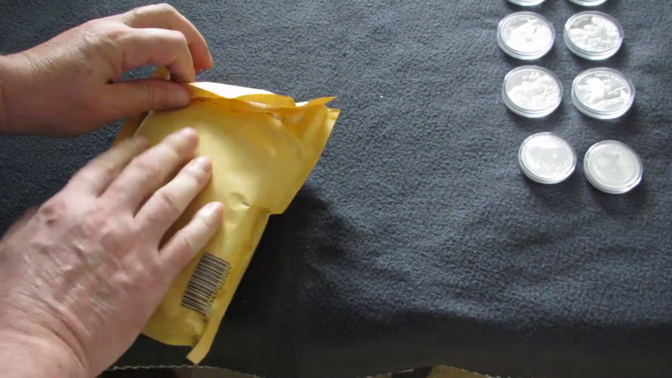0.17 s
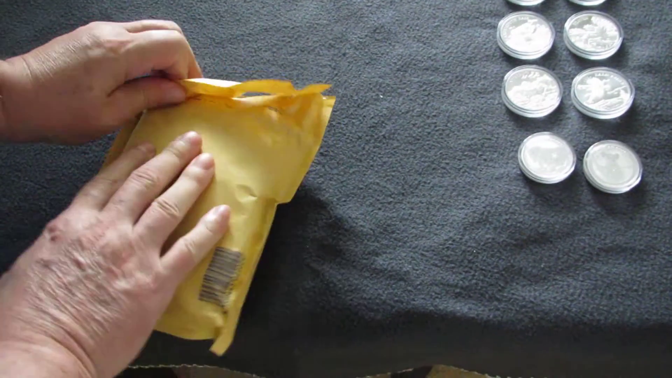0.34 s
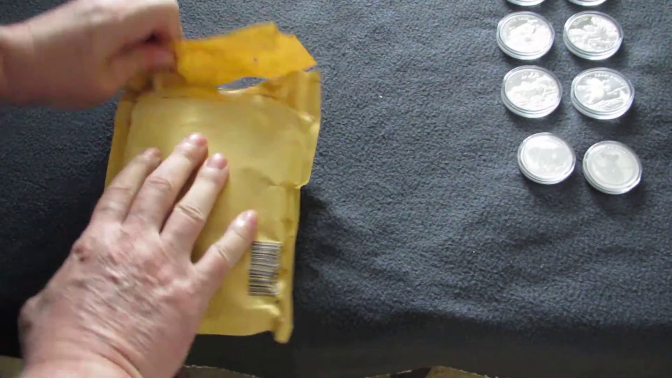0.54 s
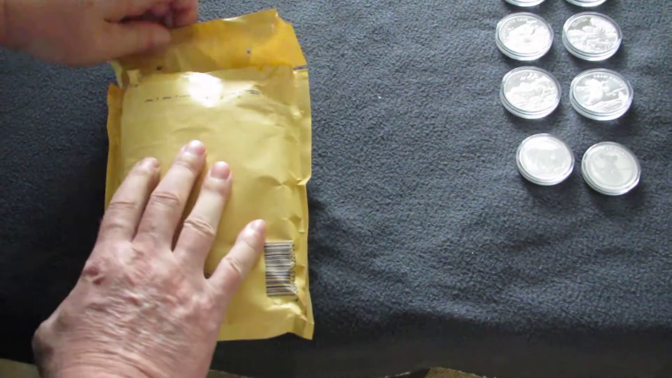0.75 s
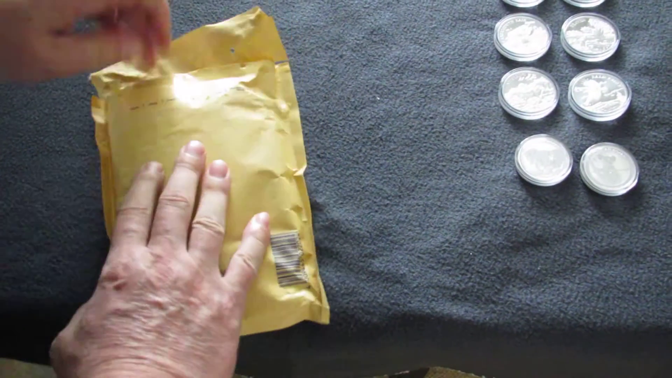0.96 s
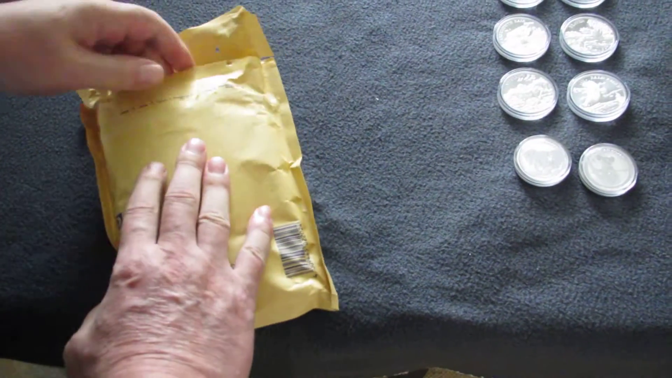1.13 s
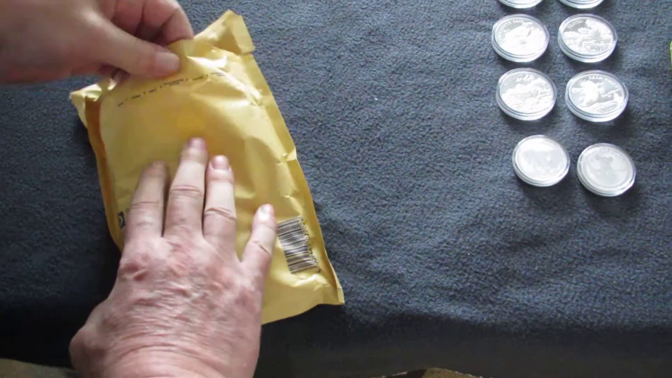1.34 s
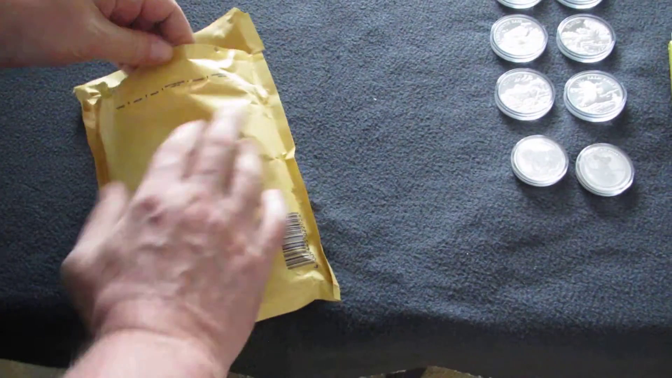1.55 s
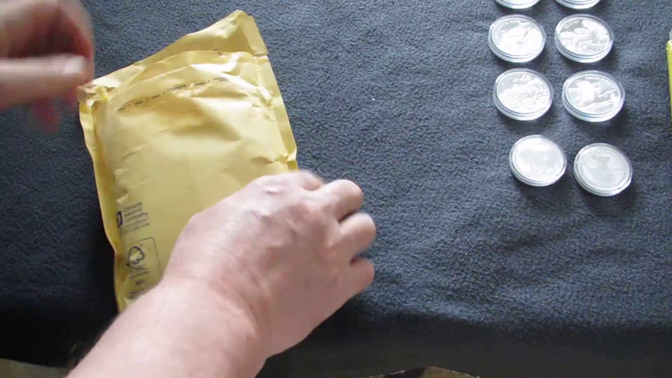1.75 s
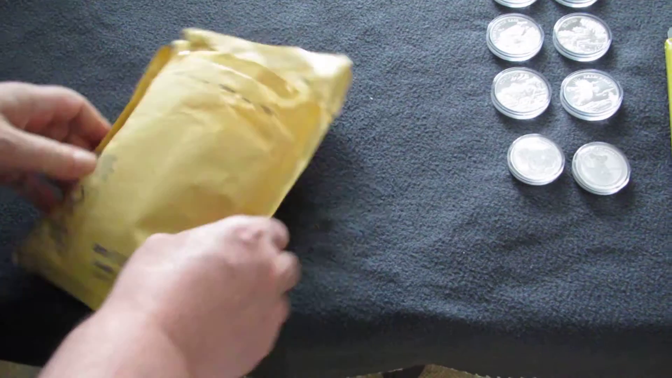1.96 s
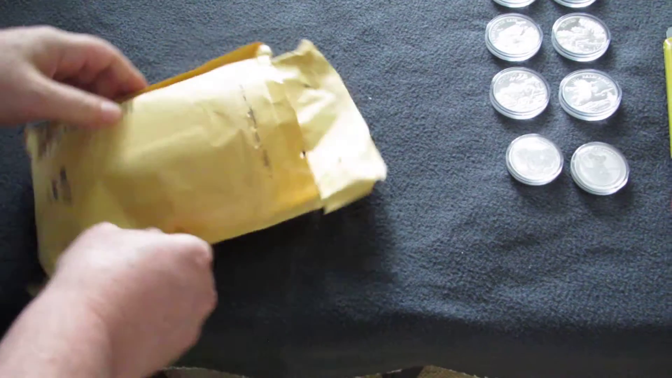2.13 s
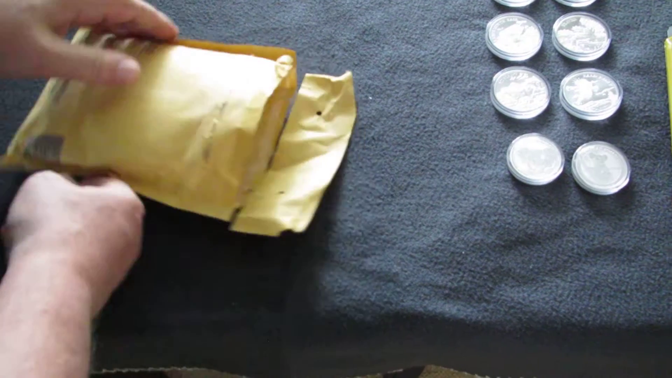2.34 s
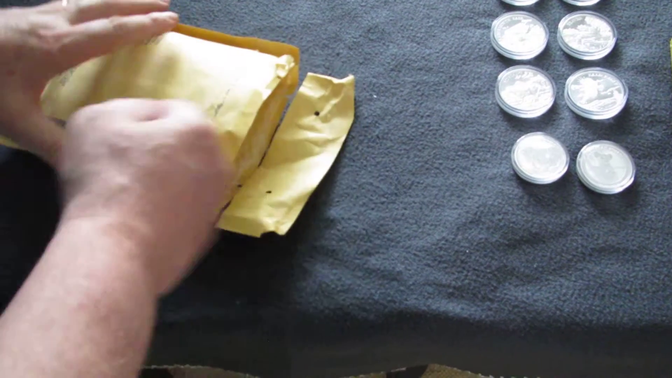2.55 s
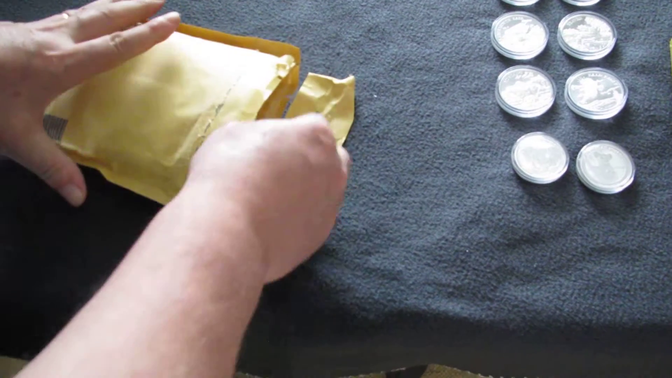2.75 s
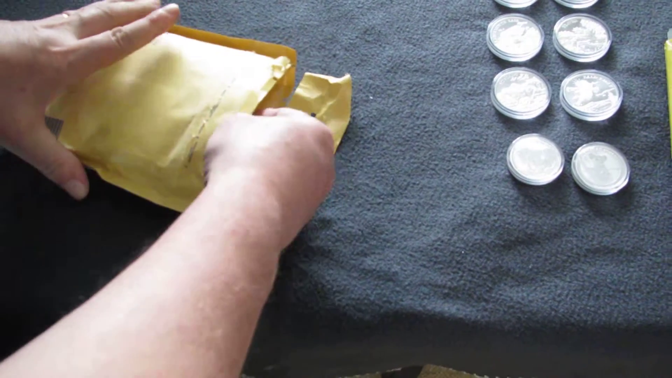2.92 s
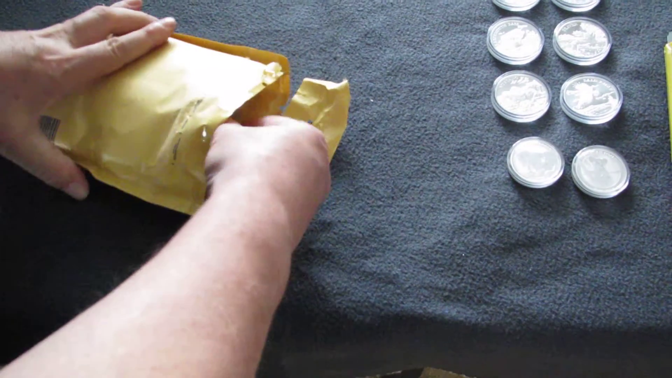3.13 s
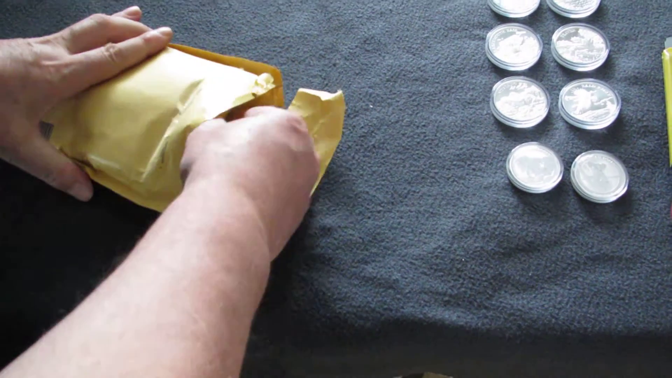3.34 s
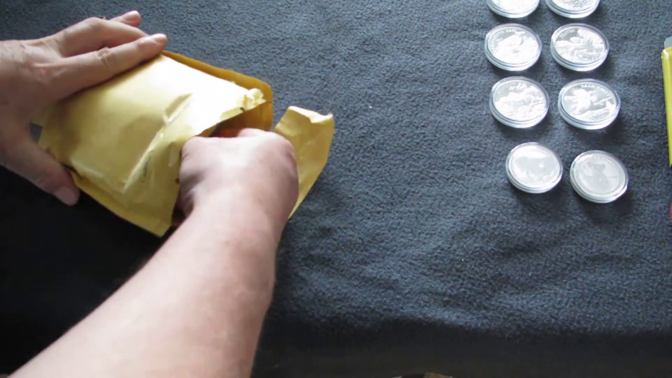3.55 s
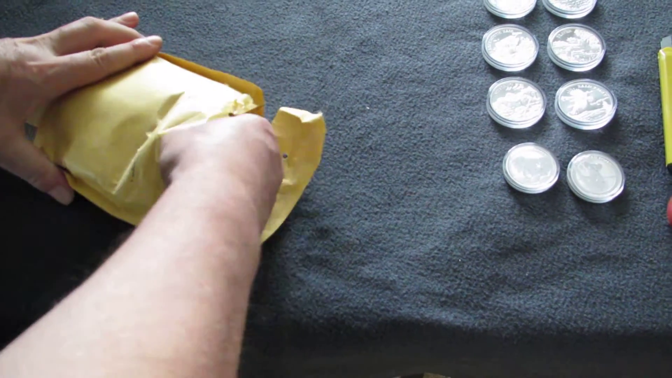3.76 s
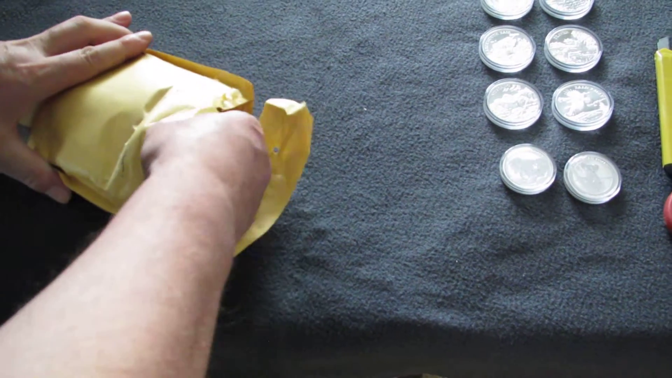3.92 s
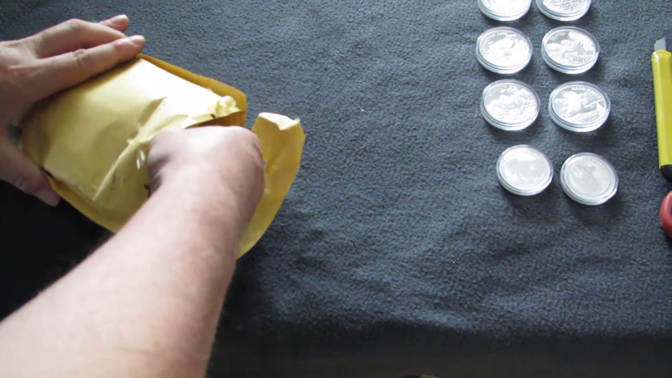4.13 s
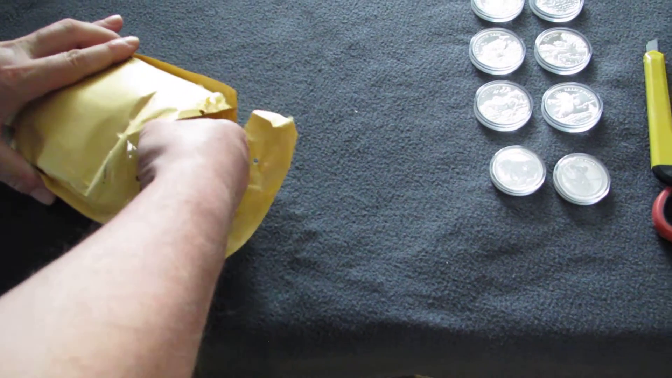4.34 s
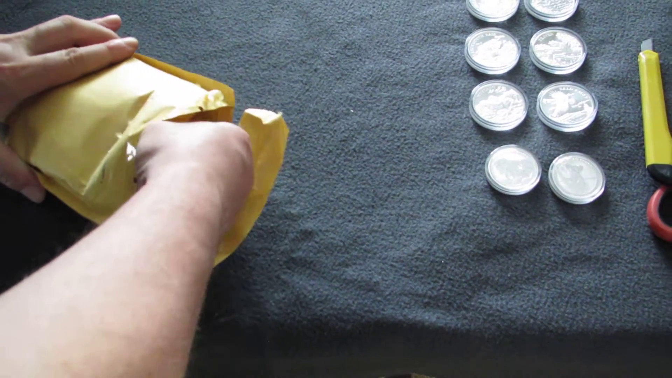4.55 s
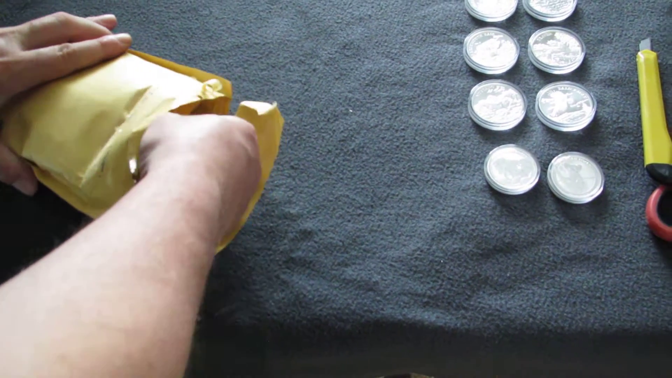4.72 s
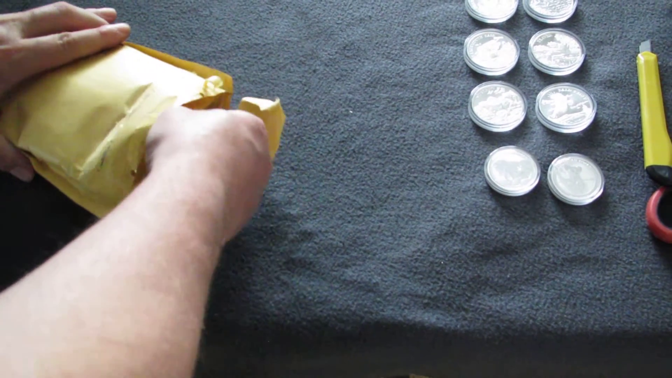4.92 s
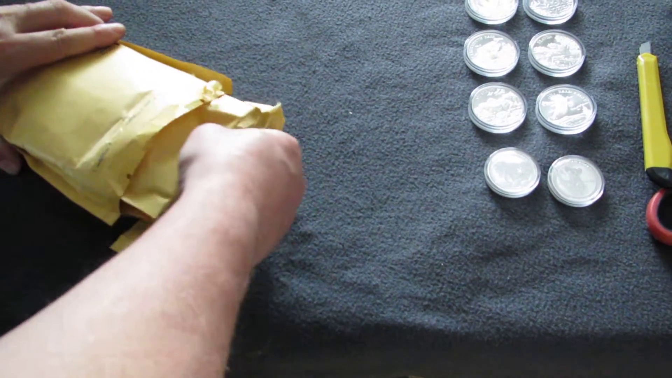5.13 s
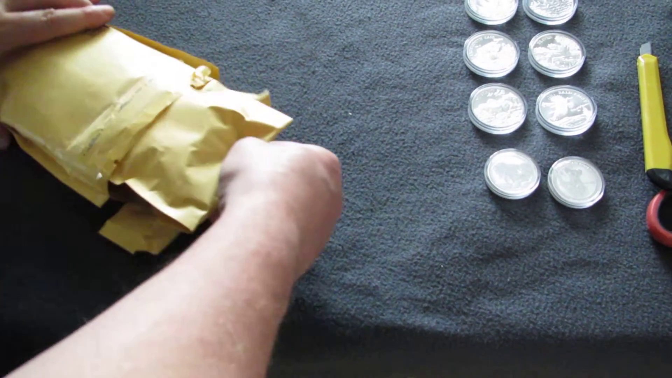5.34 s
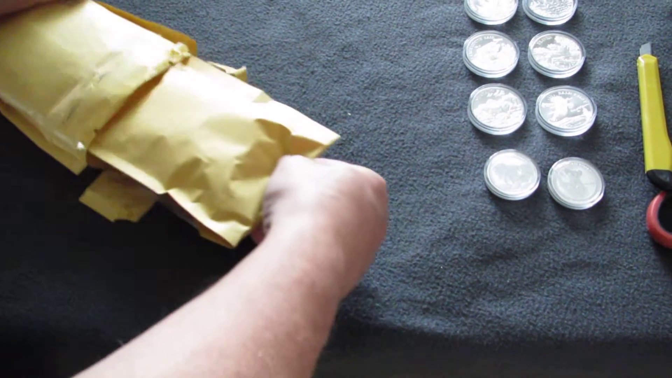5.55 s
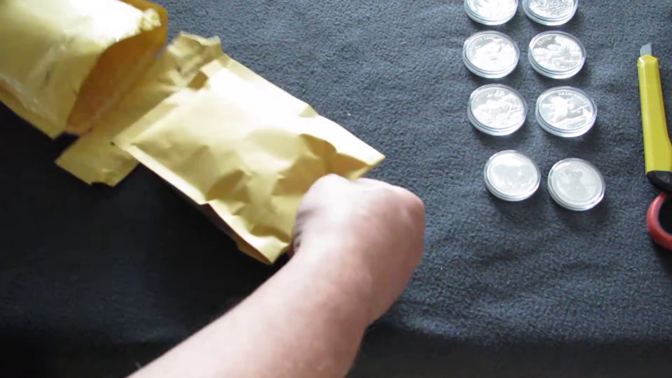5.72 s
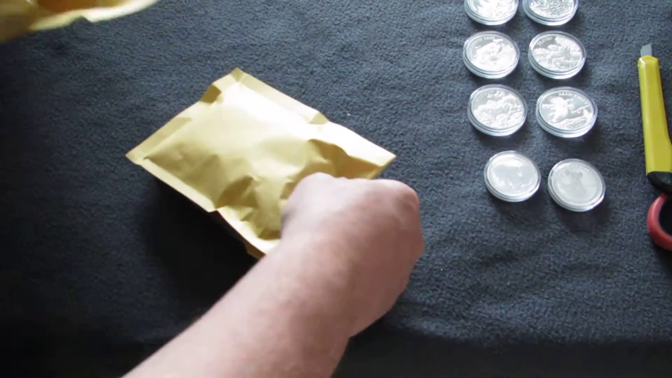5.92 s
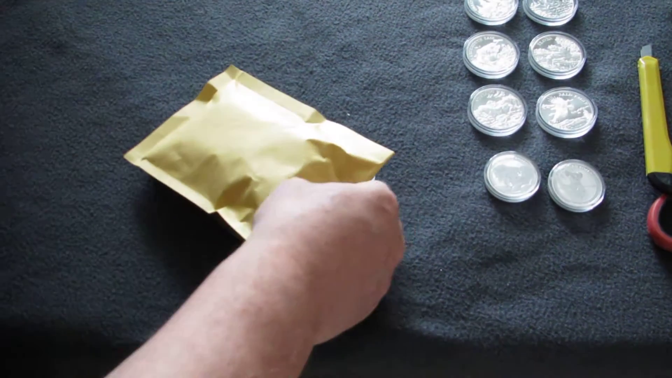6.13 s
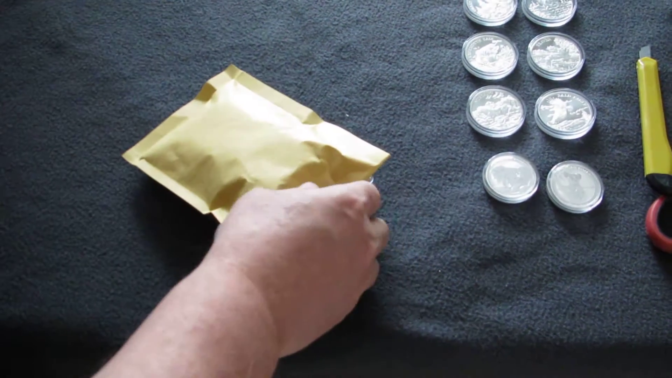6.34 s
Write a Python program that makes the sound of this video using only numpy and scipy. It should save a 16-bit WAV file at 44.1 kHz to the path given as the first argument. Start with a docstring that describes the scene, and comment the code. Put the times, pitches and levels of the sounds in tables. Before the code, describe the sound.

A padded paper mailer is opened close to a stereo camera microphone in a small, fairly dead room with a faint, wide, steady hush. Small crackles start at once, then a sharp, dense fibrous rip at about 0.2-0.45 s, with hard papery pops. Light handling dwindles until 1 s. From 1.0 to 1.65 s the envelope is pressed and shifted, in clustered crisp pops over dull padding rustle. A soft gliding hiss over cloth at 1.7-2.0 s leads into strong snaps until 2.2 s. A near lull follows until 2.65 s. Fingers then work inside from 2.7 to 4.8 s, with uneven crackles, muffled creases and small ticks. At 4.8-5.5 s a packet slides out with a continuous dry rustle and a hard snap near 5.1 s. A last double crackle comes around 5.6 s, then only faint touches until about 6.4 s.

```python
"""Short pops and cracks, then a rip: hands tear the end off a padded paper mailer, turn it over on a cloth
and drag a packet out. Creases are damped panel pulses with fibre noise and a shudder of the whole envelope.
Handling and the rip are clumped random slips in the colours of padding, wrinkles, sliding paper and fibres;
the swivel over the cloth is two gliding bands of hiss. A small, fairly dead room adds a short wide tail and
a steady wide hush, all heard through the two microphone ports of a close camera."""
import sys
import numpy as np
from scipy import signal
from scipy.fft import rfft, irfft
from scipy.io import wavfile
from scipy.ndimage import uniform_filter1d

SR = 44100
rng = np.random.default_rng(int(sys.argv[2]) if len(sys.argv) > 2 else 0)


def pcm_store(signal):
    """Save signal as 16-bit PCM."""
    levels = np.round(np.clip(np.atleast_2d(signal), -1, 1) * 32767)
    wavfile.write(sys.argv[1], SR, levels.astype(np.int16).T)


N = 285768
EDGE_HZ = 16000  # upper band limit
TAPS = 2048
HZ = np.fft.rfftfreq(TAPS, 1 / SR)
TIME = np.arange(N) / SR

# Spectrum of cracking or prickling fibres. Each row: frequency in Hz, gain in dB.
CRACK_SPECTRUM = [(60, -31), (300, -23.5), (1500, -2.5), (3000, 5), (5200, 2), (6600, -8), (8300, -2),
                  (11000, -5.5), (15000, -30)]


def amp(db):
    """Decibels to gain."""
    return 10 ** (np.asarray(db) / 20)


def unit(x):
    """Scales to an rms of one."""
    return x / np.sqrt(np.mean(x ** 2) + 1e-20)


def read(points, hz, axis=1):
    """Interpolates one column of a table over log frequency."""
    table = np.transpose(points)
    return np.interp(np.log(hz + 1), np.log(table[0] + 1), table[axis])


def level(rows, axis=1):
    """One dB column of a time curve as a gain for every sample."""
    table = np.transpose(rows)
    return amp(np.interp(TIME, table[0], table[axis]))


def add(mix, start_s, sound):
    """Mixes a sound in at start_s, cut at the end of the mix."""
    part = mix[max(round(start_s * SR), 0):][:len(sound)]
    part += sound[:len(part)]


def pulse(gain):
    """Minimum-phase pulse with these gains on the grid HZ: the sharpest causal one."""
    log_gain = np.log(np.maximum(gain, 1e-5))
    circle = np.r_[log_gain, log_gain[-2:0:-1]]
    spectrum = np.exp(np.conj(signal.hilbert(circle)))
    return irfft(spectrum[:len(HZ)])


def colour(x, spectrum):
    """Sends x through a causal filter with this spectrum."""
    return signal.oaconvolve(x, pulse(amp(read(spectrum, HZ))))[:len(x)]


def ripple(depth_db):
    """Chance peaks and dips of one patch of paper, as a gain on HZ."""
    knots_hz = np.geomspace(100, EDGE_HZ, 32)
    knots = np.c_[knots_hz, rng.standard_normal(len(knots_hz))]
    return amp(depth_db * read(knots, HZ))


def hump(hz, q, reach=1.1):
    """Gain of a heavily damped resonance; the padding soaks up what lies far above it."""
    resonance = 1 / (1 + q ** 2 * (HZ / hz - hz / (HZ + 1)) ** 2) ** 2
    soak_hz = reach * hz * (1 + 1 / q)
    return resonance / (1 + (HZ / soak_hz) ** 6)


def disperse(x, lag_s):
    """Bending waves: treble outruns bass; lag_s is the delay at one kilohertz."""
    delay_s = lag_s * np.sqrt(1000 / np.maximum(HZ, 200))
    phase = 2 * np.pi * np.cumsum(delay_s) * HZ[1]
    return irfft(rfft(x, TAPS) * np.exp(-1j * phase))


def burst(decay_s, rise_s, lumpy_db=0):
    """A dying spray of micro-slips with energy one; lumpy_db makes a few of them stand out."""
    t = np.arange(2 * TAPS) / SR
    spray, lumps = rng.standard_normal((2, len(t)))
    envelope = np.exp(-t / decay_s) * (1 - np.exp(-t / rise_s))
    spray = spray * amp(lumpy_db * lumps) * envelope
    return spray / np.linalg.norm(spray)


def at_ports(grain, apart_hz=14000, scatter_s=0.0006):
    """Short waves scatter on the camera body and reach the two ports differently."""
    scattered = signal.oaconvolve(grain, burst(scatter_s, scatter_s))[:TAPS]
    share = np.clip(.5 * (HZ / apart_hz) ** 2, 0, .7)
    mid = rfft(grain, TAPS) * np.sqrt(1 - share ** 2)
    side = rfft(scattered, TAPS) * share
    return irfft([mid + side, mid - side])[:, :len(grain)]


def wander(bandwidth_hz):
    """Smooth random curve of rms one."""
    hz = np.fft.rfftfreq(N, 1 / SR)
    return unit(irfft(rfft(rng.standard_normal(N)) * np.exp(-(hz / bandwidth_hz) ** 2), N))


def grains(spectrum, per_s, spread_db, clump_db, clump_hz, variety_db, count=12):
    """Tiny slips of uneven size come in clumps; each patch of paper has its own colour and place."""
    size = amp(spread_db * np.minimum(rng.exponential(1, N), 4)) * rng.choice([-1, 1], N)
    struck = rng.random(N) < per_s / SR
    slips = size * struck * amp(clump_db * wander(clump_hz))
    patch = rng.integers(count, size=N)
    out = np.zeros((2, N))
    for k in range(count):
        grain = pulse(amp(read(spectrum, HZ)) * ripple(variety_db))
        out += signal.oaconvolve((slips * (patch == k))[None], at_ports(grain), axes=1)[:, :N]
    # the hand's steady pull keeps the slips even over a tenth of a second
    power = abs(uniform_filter1d((out ** 2).mean(0), SR // 10))
    return out / np.sqrt(power + 1e-12)


def gesture(start_s, hold_s, rise_db_per_s, fall_db_per_s):
    """Gain of one movement of the hand: it swells, holds and lets go."""
    before_s = np.clip(start_s - TIME, 0, 1)
    after_s = np.clip(TIME - start_s - hold_s, 0, 1)
    return amp(-rise_db_per_s * before_s - fall_db_per_s * after_s)


def air(air_db=-53):
    """Steady, very wide hush of the room: coloured noise with a set left-right correlation per band."""
    # Each row: frequency in Hz, gain in dB.
    hush_spectrum = [(25, -34), (55, -19), (130, 2), (260, 6.5), (750, 3.5), (2400, -5.5), (4200, -17),
                     (5200, -18), (6700, -48), (8000, -82), (11000, -84), (16000, -39)]
    # Each row: frequency in Hz, left-right correlation (clipped to -1..1 after interpolation).
    likeness = [(100, -0.58), (700, -0.45), (1400, -2), (3100, -2), (7000, 0.34), (15000, .3)]
    hz = np.fft.rfftfreq(N, 1 / SR)
    a, b = rfft(rng.standard_normal((2, N))) * amp(read(hush_spectrum, hz))
    same = np.clip(read(likeness, hz), -1, 1)
    right = same * a + np.sqrt(1 - same ** 2) * b
    return amp(air_db) * unit(irfft([a, right], N))


def room(x, build_s=0.0038):
    """Two unrelated tails of sparse reflections, each band dying at its own speed."""
    # Each row: frequency in Hz, decay time t60 in seconds.
    decay_times = [(200, 0.49), (1000, 0.26), (4000, 0.14), (14000, 0.19)]
    length = SR // 2
    taps = rng.choice([-1., 1.], (2, length)) * (rng.random((2, length)) < .1)
    hz, t, z = signal.stft(taps, SR, nperseg=256)
    z = z * amp(-60 * t / read(decay_times, hz)[:, None])
    build = 1 - np.exp(-(TIME[:length] / build_s) ** 2)
    tail = signal.istft(z, SR)[1][:, :length] * build
    return signal.fftconvolve(x[None], tail / np.linalg.norm(tail[0]), axes=1)[:, :N]


def resonate(x, hz, width_hz):
    """One-pole resonance that follows the curve hz."""
    turn = np.exp(2j * np.pi * np.cumsum(hz) / SR)
    r = np.exp(-np.pi * width_hz / SR)
    return 2 * (turn * signal.lfilter([1 - r], [1, -r], x / turn)).real


def swivel(width_hz=1200, upper_ratio=2.11, upper_db=-2, swivel_db=-2):
    """Paper skims over cloth under the hand: two bands of hiss that glide with its speed, mostly upward."""
    # Each row: time in seconds, level in dB before swivel_db, centre of the lower band in Hz.
    path = [(1.66, -49, 3900), (1.74, -44, 3850), (1.84, -46, 4000), (1.89, -43, 4400), (1.95, -42.5, 4260),
            (2.02, -60, 4500)]
    s, _, centre_hz = np.transpose(path)
    lower_hz = np.interp(TIME, s, centre_hz)
    rub = rng.standard_normal(N)

    def band(hz):
        """Two resonances in series, at rms one."""
        return unit(resonate(resonate(rub, hz, width_hz), hz, width_hz))

    hiss = band(lower_hz) + amp(upper_db) * band(upper_ratio * lower_hz)
    moving = (TIME > s[0]) * (TIME < s[-1])
    return amp(swivel_db) * level(path) * hiss * moving


def effort():
    """Gains of crumpling, pressing and sliding: the power of each push adds to that of resting contact."""
    # Pushes: grip and pull off the flap, pin and turn the mailer, work the fingers in, draw out the packet.
    # Each row: start in seconds, hold in seconds, crumpling in dB, pressing on the cushion in dB, sliding in dB.
    pushes = [ (0.0, 0.0044, -33.5, -34.5, -45), (0.09, 0.097, -47.5, -63, -74),
              (0.213, .06, -39, -60, -42), (0.353, 0.067, -26, -32, -46), (0.579, 0.011, -37, -39.5, -39),
              (1.02, 0.065, -43.5, -48, -42), (1.127, 0.076, -31.5, -32.5, -34.5),
              (1.344, 0.056, -31, -35, -41.5), (1.577, 0.012, -43, -37.5, -50),
              (1.635, 0.027, -38, -33.5, -40.5), (1.735, .015, -45, -47, -43),
              (1.75, 0.067, -36.5, -46, -45.5), (1.986, 0.034, -32.5, -52, -39),
              (2.174, 0.039, -35.5, -53, -40.5), (2.298, 0.0071, -49, -55, -50.5),
              (2.382, 0.024, -55, -53, -54), (2.519, 0.052, -53.5, -52.5, -60),
              (2.718, 0.026, -38.5, -51, -42.5), (2.838, 0.017, -41, -60, -46.5),
              (2.949, 0.098, -33, -33.5, -43), (3.16, .02, -54, -38, -41.5), (3.225, 0.062, -36, -43, -41),
              (3.398, 0.28, -43, -47, -46.5), (3.774, 0.13, -40.5, -42.5, -47.5),
              (4.032, 0.022, -49, -47.5, -44.5), (4.182, 0.16, -39.5, -40, -46),
              (4.415, 0.077, -38, -40.5, -41), (4.683, 0.082, -31, -45.5, -39.5),
              (4.814, .05, -29.5, -44, -35), (4.966, 0.49, -34, -42.5, -36.5),
              (5.48, 0.089, -40, -38, -44.5), (5.626, 0.017, -34.5, -35, -44),
              (5.796, 0.079, -47, -49, -50), (6.106, 0.11, -52, -55, -65), (6.415, 0.032, -54.5, -62, -53)]
    # Hands resting on the paper between pushes. Each row: time in seconds, crumpling level in dB.
    contact = [(0.05, -47), (0.52, -43), (0.66, -52.5), (0.76, -47.5), (0.92, -50), (1.28, -41.5),
               (1.52, -56.5), (1.68, -45.5), (2.14, -42.5), (2.27, -63), (2.63, -56.5), (2.76, -44.5),
               (3.35, -44), (4.6, -47), (4.9, -36.5), (5.72, -52), (6.02, -54), (6.45, -57.5)]
    press_db, slide_db = -11.5, -3.5  # resting hands, relative to their crumpling
    rise_db_per_s, fall_db_per_s = 388, 311
    power = (level(contact) * amp([[0], [press_db], [slide_db]])) ** 2
    for start_s, hold_s, *levels_db in pushes:
        push = gesture(start_s, hold_s, rise_db_per_s, fall_db_per_s)
        power += np.outer(amp(levels_db) ** 2, push ** 2)
    return np.sqrt(power)


def handling(cushion_db=-4.0, crumple_db=-2.5, slide_db=0.08, prickle_db=-5):
    """Padding rustles dully, wrinkles rasp and tick, dry surfaces hiss and prickle as they slide."""
    # Spectra of padding, wrinkles and sliding. Each row: frequency in Hz, gain in dB.
    cushion_spectrum = [(40, -34), (100, -29), (170, -9.5), (250, -0.5), (370, 4.5), (520, -2), (800, 1.5),
                        (2000, -51)]
    crumple_spectrum = [(250, -42), (450, 0), (620, 5.5), (1150, 8), (1700, 5.5), (2900, 1.5), (4000, -8),
                        (8000, -72), (16000, -68)]
    slide_spectrum = [(1000, -35.5), (2800, 3), (4100, -4), (5300, 2), (6600, -7.5), (8200, 1.5),
                      (10000, -0.5), (12000, -6.5), (14500, -16), (16000, -29)]
    # How freely wrinkles tick and fibres prickle; low again as the packet is drawn out flat.
    # Each row: time in seconds, gain in dB.
    ticking = [(0.9, -21), (1.1, -5.5), (4.5, -1.5), (4.9, -17), (5.35, -4.5), (5.55, 0)]
    cushion = grains(cushion_spectrum, per_s=540, spread_db=2.5, clump_db=4.0, clump_hz=33, variety_db=1.5)
    rasp = grains(crumple_spectrum, per_s=2000, spread_db=0.5, clump_db=1.5, clump_hz=26, variety_db=5.5)
    ticks = grains(crumple_spectrum, per_s=90, spread_db=3.2, clump_db=2, clump_hz=20, variety_db=4.5)
    slide = grains(slide_spectrum, per_s=7000, spread_db=3.5, clump_db=2.0, clump_hz=104, variety_db=1.0)
    prickle = grains(CRACK_SPECTRUM, per_s=90, spread_db=3.5, clump_db=2, clump_hz=20, variety_db=3)
    freedom = level(ticking)
    crumpling = amp(crumple_db) * rasp + freedom * ticks
    pressing = amp(cushion_db) * cushion
    sliding = amp(slide_db) * slide + amp(prickle_db) * freedom * prickle
    return (effort()[:, None] * np.array([crumpling, pressing, sliding])).sum(0)


def rip(rip_db=0.5):
    """Fibres break in a dense run along the tear; the flap rings near a kilohertz."""
    # Each row: frequency in Hz, gain in dB.
    fibre_spectrum = [(100, -59), (330, -10.5), (750, -12.5), (1120, 2.5), (1500, -6), (3000, -9.5),
                      (5200, -3.5), (6600, -15), (8200, -2), (10500, -5), (13000, -11), (16000, -24)]
    # Tugs that rip the strip further. Each row: start in seconds, hold in seconds, level in dB before rip_db.
    tugs = [(0.228, 0.057, -31), (0.311, .03, -21.5), (0.339, 0.051, -15.5), (0.442, 0.0041, -28.5)]
    rise_db_per_s, fall_db_per_s = 594, 1102
    pulls = [amp(db) * gesture(s, hold_s, rise_db_per_s, fall_db_per_s) for s, hold_s, db in tugs]
    tearing = np.max(pulls, axis=0)
    fibres = grains(fibre_spectrum, per_s=6000, spread_db=-1.0, clump_db=2.5, clump_hz=400, variety_db=0.0)
    return amp(rip_db) * tearing * fibres


def snaps(cushion_hz=520, cushion_q=0.58, pop_db=-2.4, crack_db=0, shudder_db=-1.5, shudder_s=0.012,
          crack_s=0.00086, puff_db=-38, own_share=0.49, chatter_db=-11):
    """A buckling panel flips with a damped pop, fibres crack along the fold, and the envelope shudders."""
    # Each row: start in seconds, strength in dB, panel pitch in Hz, cushion thump in dB, fibre crack in dB;
    # thump and crack are relative to the strength, all before the layer levels.
    creases = [(0.071, 11.5, 1820, -21, -30), (0.081, 4, 1580, -12, -5), (0.113, -3, 1740, -14, -20),
               (0.18, 9.5, 1100, -18, -17.5), (0.346, 23.5, 1150, -28, -15), (0.366, 18, 970, -2, -11),
               (0.41, 25.5, 1060, -4, -13.5), (0.497, 9.5, 1040, -35, -10.5), (0.697, 9, 1230, -17, -8.5),
               (0.772, -19, 2500, -10, 5), (0.962, 5.5, 1820, -10, -13.5), (1.042, 4.5, 1090, -18, -28),
               (1.064, 15, 1170, -26, -19.5), (1.111, 9, 1060, -5, -1), (1.12, 13.5, 1040, -24, -15),
               (1.151, 14.5, 820, -13, -12.5), (1.205, 18, 1090, -8, -15.5), (1.327, 18.5, 1220, -27, -15),
               (1.351, 19, 1100, -23, -7), (1.384, 7, 1390, -18, -29), (1.395, 16.5, 1230, -3.5, -22),
               (1.426, 10, 1110, -4, -18), (1.561, 2.5, 1120, -10, -17.5), (1.626, 22.5, 1500, -17, -19),
               (1.632, 13, 1270, -7, -17), (1.646, 2.5, 1720, -4, -2), (1.754, 11.5, 990, -14, -26),
               (1.853, 4, 1430, -12, -9.5), (1.982, 19.5, 1550, -1.5, -13), (2.013, 13.5, 2060, -4.5, -18),
               (2.067, 14, 1290, -18, -27), (2.098, 22.5, 1300, -16, -36), (2.162, 22.5, 830, -11.5, -31),
               (2.165, 9.5, 970, -18, -8), (2.221, 12.5, 1190, -30, -19), (2.68, 18.5, 1250, -2, -26.5),
               (2.717, 2, 1900, -18, -10), (2.777, 10.5, 1300, -15, -17.5), (2.841, 10, 1300, -10, -22),
               (2.925, 16, 1180, -10, -13.5), (2.943, 19, 1210, -4, -40), (2.999, 19, 1370, -13, -37),
               (3.034, 2.5, 1300, -1, -3.5), (3.073, 3.5, 1160, -15, -23), (3.121, 9, 1340, -20, -22),
               (3.144, 7.5, 1600, -7, -13), (3.166, 4, 1390, 3.5, -35), (3.239, -3, 1640, -9, -2),
               (3.259, 13.5, 1640, -18, -10), (3.292, 14, 1320, -6, -17.5), (3.454, 16.5, 1240, -4, -26.5),
               (3.502, 18, 1170, -14.5, -23), (3.534, 15.5, 1260, -33, -39), (3.573, 11, 1310, -12, -13.5),
               (3.707, 19.5, 1070, -2, -17.5), (3.778, 22, 1470, -4.5, -17), (3.786, 22, 1500, -31, -22),
               (3.845, 12, 1860, -7, -24), (3.855, 12.5, 1180, -25, -31), (3.888, 13, 1420, -4.5, -28),
               (4.037, 5, 1560, -3, -27), (4.177, 8, 1530, -10, -40), (4.255, 12, 1140, 0, -33),
               (4.2854, 18.5, 4670, -16, -13), (4.2867, 20.5, 2900, -13, -17), (4.299, 14, 1600, -11, -20),
               (4.383, 6, 1130, 4, -21), (4.436, 12, 1490, -25, -25), (4.476, 10, 2000, -14, -31),
               (4.551, 16.5, 1750, -5.5, -23.5), (4.643, 17, 1450, 2.5, -39), (4.73, 15.5, 1780, -33, -16),
               (4.821, 11.5, 1550, -18, -31), (5.0898, 20.5, 3140, -33, -13), (5.091, 24.5, 685, -24, -38),
               (5.251, 10, 1180, -1, -22), (5.484, -1, 2080, 3, -27), (5.534, 8.5, 1880, -23, -16),
               (5.619, 19, 1450, -28, -19), (5.623, 19.5, 1700, 2.5, -19), (5.766, -1.5, 1240, 6, -37),
               (5.844, 3, 1690, 1.5, -19), (6.106, 8, 860, 0.5, -45), (6.443, -8, 1220, -25, -30)]
    # Body of the envelope. Each row: frequency in Hz, gain in dB.
    shake_spectrum = [(30, -22), (110, -16.5), (230, 8.5), (400, 1.5), (1100, 8.5), (2500, 2), (5200, -4),
                      (6600, -15), (9000, -3.5), (16000, -21)]
    typical_hz, typical_q, typical_db = 1300, 0.64, 15
    q_growth = 0.25  # power of pitch: small, stiff panels ring more sharply
    q_per_db = 0.0083  # log growth of Q per dB: harder flips ring more sharply
    shudder_growth = 0.67  # dB of shudder per dB of snap: hard snaps are the driest
    pops, cracks, shudders = np.zeros((3, N))
    puff = amp(puff_db) / (1 + (HZ / 300) ** 2)  # air pushed out of the cushion
    body = amp(read(shake_spectrum, HZ))
    share = np.clip(own_share, 0, 1)
    for s, db, hz, thump_db, fibre_db in creases:
        q = typical_q * (hz / typical_hz) ** q_growth * np.exp(q_per_db * (db - typical_db))
        thump = amp(thump_db) * (hump(cushion_hz, cushion_q) + puff)
        panel = np.hypot(hump(hz, q), thump) * ripple(depth_db=4.0)
        flip = disperse(pulse(panel), lag_s=0.000693)
        add(pops, s, amp(db) * rng.choice([-1, 1]) * flip)
        # the fold keeps giving way for a few milliseconds
        chatter = signal.fftconvolve(flip, burst(0.00094, 0.0015))
        add(pops, s, amp(db + chatter_db) * chatter)
        add(cracks, s, amp(db + fibre_db) * burst(crack_s, 0.00023))
        # the shudder passes the envelope's body and keeps part of the panel's colour
        ring = pulse(panel ** share * body)
        ring = ring * np.linalg.norm(flip) / np.linalg.norm(ring)
        shudder = signal.fftconvolve(ring, burst(shudder_s, 0.00035, lumpy_db=7.0))
        add(shudders, s, amp(shudder_growth * db) * shudder)
    return amp(pop_db) * pops + amp(crack_db) * colour(cracks, CRACK_SPECTRUM) + amp(shudder_db) * shudders


def scene(room_mid_db=-15, room_side_db=-16):
    """The mailer close in front, with the room around it."""
    paper = snaps() + handling() + rip() + swivel()
    mid, side = room(paper.mean(0))
    wide = side * np.array([[1], [-1]])
    return paper + amp(room_mid_db) * mid + amp(room_side_db) * wide + air()


def record(dry, ceiling=0.82):
    """The two ports differ in level and phase; peaks above the ceiling overload; then the band limit."""
    # Each row: frequency in Hz, left minus right in dB, lead of the left port in radians.
    ports = [(200, -1, 0.51), (700, -1.5, 0), (1300, -.5, 0.37), (4400, -2, 0.1), (7500, -3.5, 0.4),
             (12800, -3, 1), (16000, -1, 1)]
    hz = np.fft.rfftfreq(N, 1 / SR)
    half = amp(read(ports, hz, axis=1) / 2) * np.exp(.5j * read(ports, hz, axis=2))
    heard = irfft(rfft(dry) * np.array([half, 1 / half]), N)
    heard = np.clip(heard, -ceiling, ceiling)
    lowpass = signal.firwin(511, EDGE_HZ, window=("kaiser", 8), fs=SR)
    return signal.oaconvolve(heard, lowpass[None], "same")


dry = scene()
out = record(dry)
pcm_store(out)
```